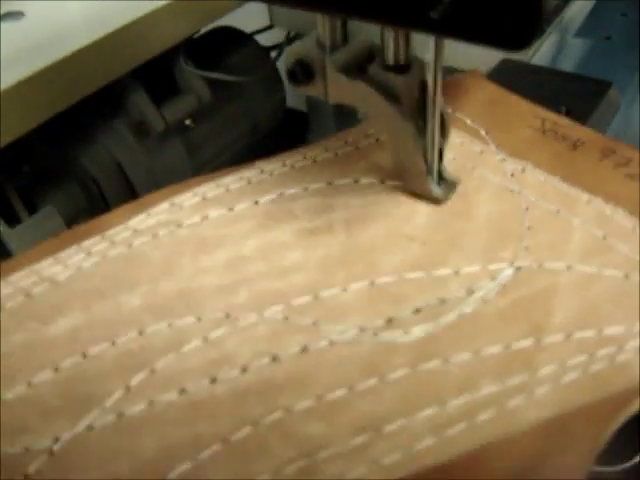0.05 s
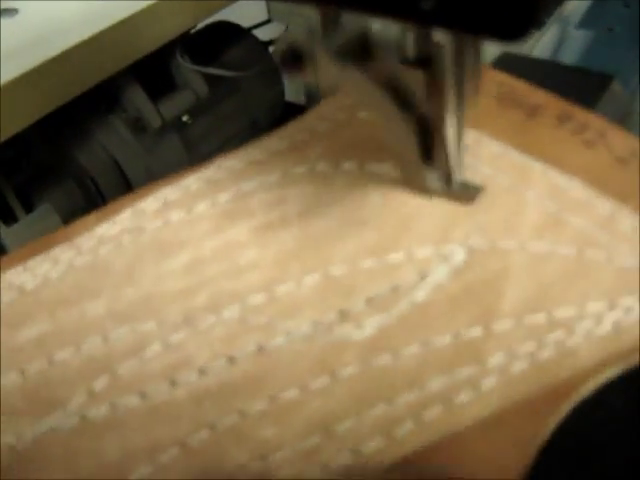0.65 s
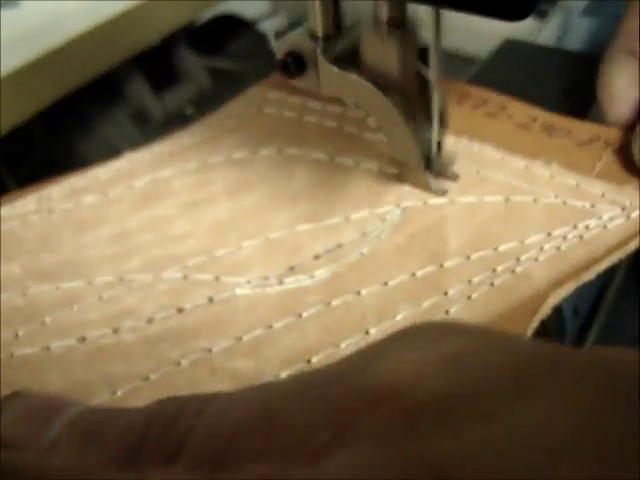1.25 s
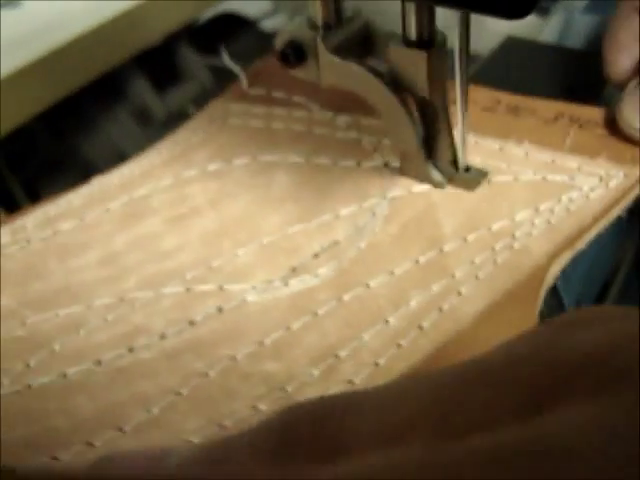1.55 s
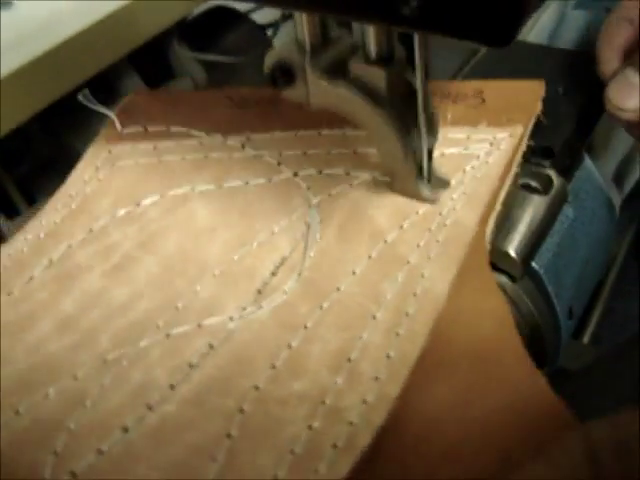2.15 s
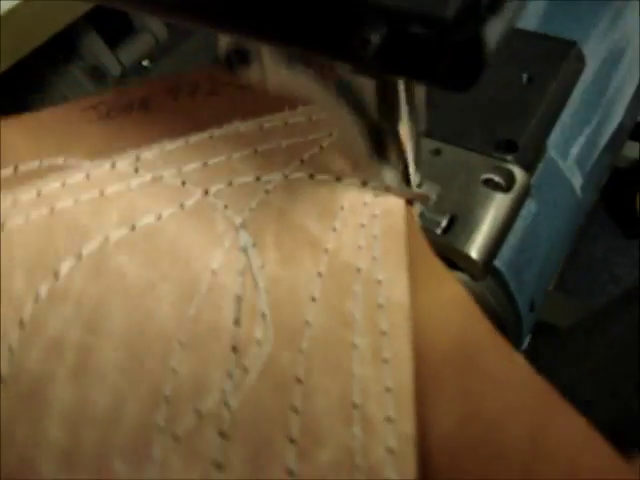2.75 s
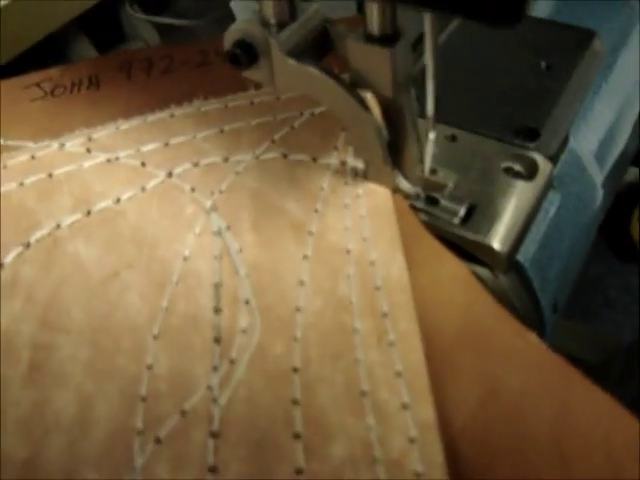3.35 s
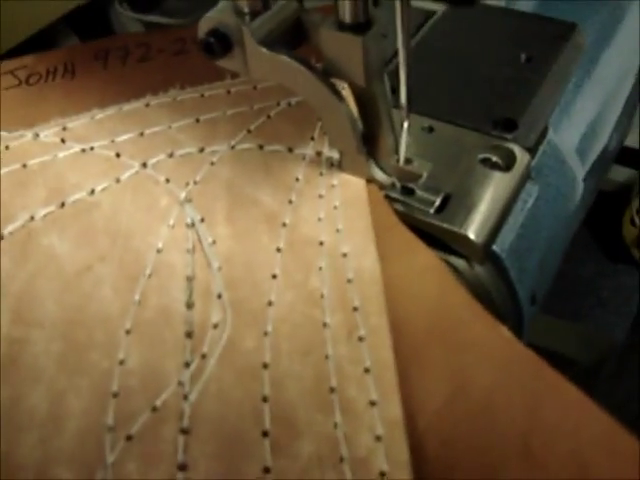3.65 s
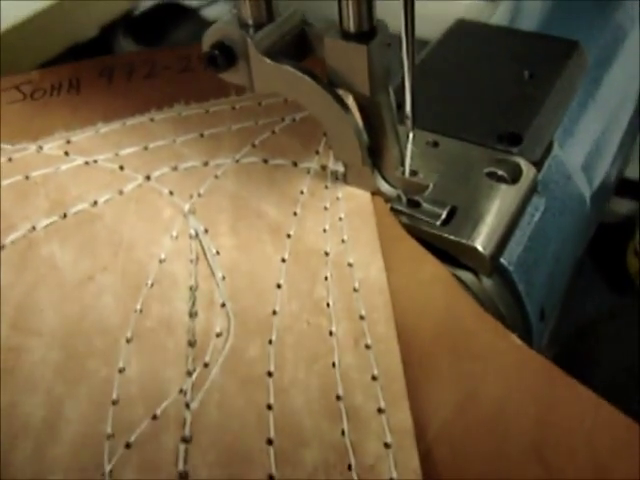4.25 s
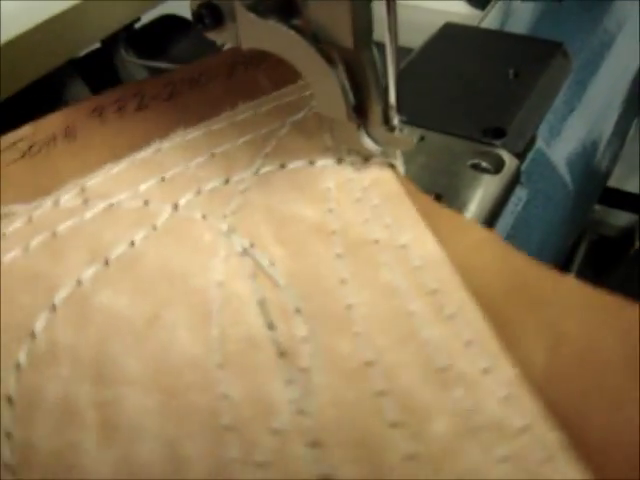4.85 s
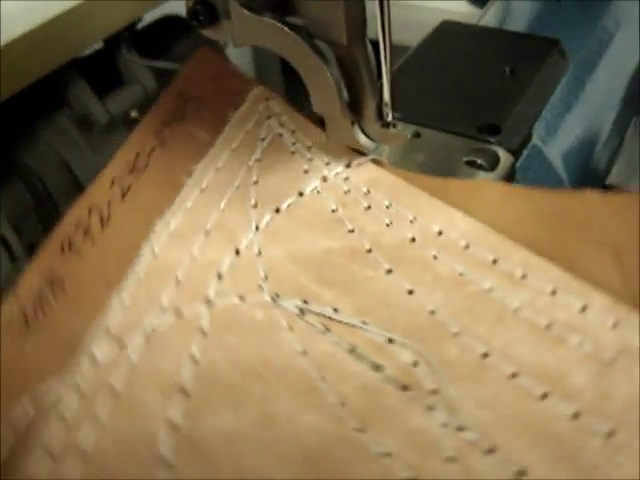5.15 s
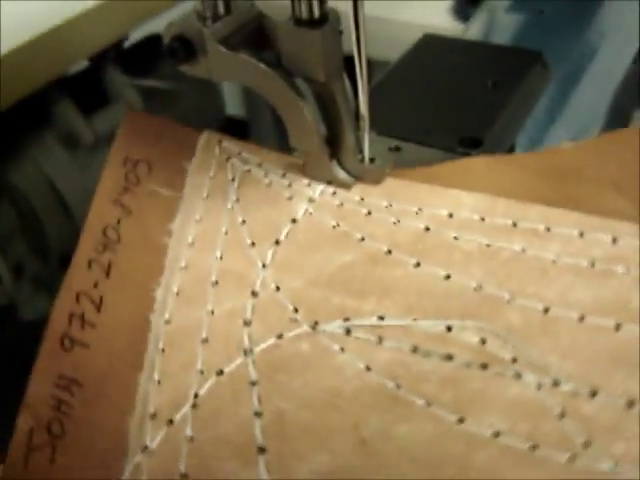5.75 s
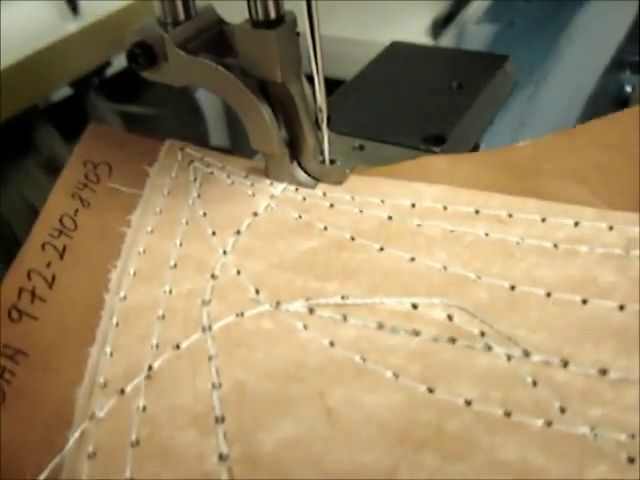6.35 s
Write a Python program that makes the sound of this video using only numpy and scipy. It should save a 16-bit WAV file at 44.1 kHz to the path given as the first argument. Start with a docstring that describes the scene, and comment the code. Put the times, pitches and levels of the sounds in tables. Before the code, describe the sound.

A heavy sewing machine clatters evenly through leather, stops with a clunk, then lever clicks and soft leather handling follow.

```python
"""Walking-foot machine sewing leather

A heavy machine, close by, sews just over four stitches a second. Each shaft turn brings gear rattle,
linkage scrapes, a needle knock, a double clack of the feet and a thread tick; the iron frame rings.
It brakes and latches at about 3 s. The workshop background fades up, the foot lever snaps up,
the leather taps and slides as it is turned, and the foot drops."""
import sys
import numpy as np
from scipy import signal
from scipy.fft import rfft, irfft
from scipy.io import wavfile
from scipy.ndimage import uniform_filter1d, map_coordinates

SR = 44100
rng = np.random.default_rng(int(sys.argv[2]) if len(sys.argv) > 2 else 0)


def materialize(psi):
    """Save the field psi as 16-bit PCM at rate SR to the path in sys.argv[1].

    A 1-D psi becomes a single channel; in a 2-D psi each row is a channel.
    """
    bounded = np.clip(np.atleast_2d(psi).T, -1, 1)
    quanta = np.round(bounded * 32767).astype(np.int16)
    wavfile.write(sys.argv[1], SR, quanta)


N = 291060
TIME = np.arange(N) / SR
LULL_AT_TURNS, LULL_WIDTH_TURNS = 0.559, 0.044  # shaft phase where the feet trade grip

# One stitch per shaft turn. Each row: start in seconds, needle knock in dB, first clack in dB,
# second clack in dB, clack gap in seconds, steel snap in dB, bed thud in dB, thread tick in dB.
STITCHES = [(-.088, -8, -2, -5, 0.014, -24, -16, -2), (.142, -8, -9, -24, 0.015, -16, -40, -13),
            (.372, -11.5, 0.5, -5.5, .012, -17.5, -12.5, -8.5), (.605, -8, 3, -2, 0.014, -24, -16.5, -7.5),
            (.836, -11, -4, -1, 0.011, -12, -12.5, -7.5), (1.069, -10.5, -3, -3.5, 0.015, -22, -18, -9),
            (1.2996, -6, -7.5, -29, .017, -11.5, -25, -10),
            (1.5306, -10.5, -9, -6.5, 0.018, -11.5, -35, -7),
            (1.7609, -11, -12, -5, 0.011, -12.5, -16.5, -6.5), (1.991, -11, -6.5, -18, .015, -12, -20, -10),
            (2.2242, -12.5, -6.5, -13, 0.019, -15.5, -40, -11),
            (2.4553, -12, -2.5, 0, 0.0088, -10.5, -17.5, -6),
            (2.6871, -10.5, -3.5, -0.5, 0.018, -18, -15, -7.5),
            (2.9343, -19, -40, -29, 0.0092, -39, -44, -39)]
# Iron frame and bed. Each row: mode in Hz, level in dB, t60 in seconds.
FRAME_MODES = [(256.5, -15, 0.16), (335.4, -18, 0.42), (680.5, -2, 0.076), (774, -3, 0.093),
               (820, -1, 0.057), (853.5, 1.5, 0.15), (957, -14, 0.079), (1023, -11, 0.16),
               (1113, -5, 0.075), (1150, -23, 0.18), (1528, -12, 0.12), (1743, -17.5, 0.39),
               (1940, -4.5, 0.059), (2880, -12, 0.046), (3253, -6, 0.05), (4420, -12, 0.046)]
# Workshop hiss and sliding leather. Each row: frequency in Hz, level in dB.
HISS_SPECTRUM = [(1500, -30.5), (2600, 1.5), (4500, -1), (7000, -4), (10000, -6.5)]


def undb(db):
    """Decibels to gain."""
    return 10 ** (np.asarray(db) / 20)


def unit(x):
    """Scale to rms 1."""
    return x / np.sqrt(np.mean(x ** 2) + 1e-18)


def convolve(x, response):
    """Filter by a response scaled to unit energy."""
    return signal.oaconvolve(x, response / np.sqrt(np.sum(response ** 2)))[:len(x)]


def colour(x, spectrum, tilt_db_per_oct=0, size=4096):
    """Minimum-phase filter from (Hz, relative dB) points, tilted two octaves either side of 3 kHz."""
    octave = np.log2(np.maximum(np.arange(size // 2 + 1) * SR / size, 1))
    hz, db = np.transpose(spectrum)
    db = np.interp(octave, np.log2(hz), db) + tilt_db_per_oct * np.clip(octave - np.log2(3000), -2, 2)
    cepstrum = irfft(np.log(undb(db)))
    cepstrum[1:size // 2] *= 2
    cepstrum[size // 2 + 1:] = 0
    return convolve(x, irfft(np.exp(rfft(cepstrum))))


def ring(x, modes):
    """Damped modes; each level sets that mode's share of the energy."""
    t = TIME[:SR // 2]
    response = np.zeros(len(t))
    for hz, db, t60_s in modes:
        envelope = undb(db) / np.sqrt(t60_s) * np.exp(-np.log(1000) * t / t60_s)
        response += envelope * np.sin(2 * np.pi * hz * t + rng.uniform(0, 2 * np.pi))
    return convolve(x, response)


def resonance(x, hz, width_hz):
    """Two peak filters in series."""
    b, a = signal.iirpeak(hz, hz / min(1.5 * width_hz, SR / 4), fs=SR)
    one_stage = signal.lfilter(b, a, signal.unit_impulse(4096))
    return convolve(x, signal.lfilter(b, a, one_stage))


def walk(rate_hz):
    """Smooth random drift, rms 1."""
    step = max(int(SR / rate_hz), 1)
    stairs = np.repeat(rng.standard_normal(N // step + 1), step)
    return unit(uniform_filter1d(stairs, step)[:N])


def swells(rows):
    """Summed bell-shaped gain curves."""
    return sum(undb(db) * np.exp(-((TIME - mid_s) / half_s) ** 2) for mid_s, db, half_s in rows)


def chatter(spread_db, size=N, hold_samples=12):
    """Dense micro-impacts of uneven, bounded strength."""
    strength_db = spread_db * np.sqrt(3) * rng.uniform(-1, 1, size // hold_samples + 1)
    return unit(np.repeat(undb(strength_db), hold_samples)[:size] * rng.standard_normal(size))


def contacts(times_s, levels_db, rise_s, decay_s, spread_db=3):
    """Contact force: chatter builds up to each blow and dies away."""
    out = np.zeros(N)
    blows = np.broadcast_arrays(np.atleast_1d(times_s), levels_db, rise_s, decay_s)
    for at_s, db, up_s, down_s in zip(*blows):
        first, last = max(int((at_s - 5 * up_s) * SR), 0), min(int((at_s + 6 * down_s) * SR), N)
        if last > first + 1:
            t = TIME[first:last] - at_s
            envelope = np.exp(np.minimum(t / up_s, -t / down_s))
            burst = unit(envelope * chatter(spread_db, size=len(t)))
            out[first:last] += undb(db) * np.sqrt(np.mean(envelope ** 2)) * burst
    return out


def strike(blows, spectrum, modes, ring_db, rattle_db):
    """Blows on one part: a crack, a buzz of loose joints, then the part's ring."""
    cracks, kicks = np.zeros(N), np.zeros(N)
    for at_s, db, rise_s, decay_s, tilt_db_per_oct in blows:
        force = contacts(at_s, db, rise_s, decay_s, spread_db=3.5)
        force += contacts(at_s + decay_s, db + rattle_db, rise_s, 3 * decay_s, spread_db=16)
        cracks += colour(force, spectrum, tilt_db_per_oct)
        kicks[int(at_s * SR)] = np.sqrt(np.sum(force ** 2))
    return cracks + undb(ring_db) * ring(kicks, modes)


def workshop(fade_from_s=3.27, fade_db_per_s=7):
    """Drone, rumble, hiss and motor hum; turned down during stitching, faded up afterwards."""
    # Drone and rumble spectra. Each row: frequency in Hz, level in dB.
    drone_spectrum = [(150, -31.5), (250, -5), (280, -13), (416, -10), (462, -11), (534, 1), (574, -5.5),
                      (678, -9.5), (844, -6.5), (1050, -14.5), (1770, -19.5), (2060, -17.5), (3000, -30.5),
                      (3900, -50), (6600, -120)]
    rumble_spectrum = [(12, -50), (20, -14), (43, 0.5), (76, -3.5), (108, 1.5), (123, 5.5), (144, -3.5),
                       (177, 2.5), (239, -5), (275, -7.5), (318, -4.5), (350, -19.5), (460, -43.5),
                       (770, -120)]
    # Idling motor. Each row: partial in Hz, relative level in dB.
    motor_partials = [(113.2, 2), (95.5, -4.5), (178.2, -3), (520, -13.5), (707, -19.5), (1040, -14.5)]
    # Surges of the hum. Each row: middle in seconds, level in dB, half length in seconds.
    hum_surges = [(4.08, -55, .07), (5.15, -47, 0.14), (5.93, -44.5, 0.091), (6.3, -51.5, 0.065)]
    dip_db = np.clip(13 - fade_db_per_s * (TIME - fade_from_s), 0, 13)
    drone = undb(-40.5 - dip_db + 0.93 * walk(14)) * colour(chatter(1.1), drone_spectrum)
    rumble = undb(-42 - dip_db + walk(4.09)) * colour(chatter(1), rumble_spectrum, size=16384)
    hiss = undb(-55 - 0.37 * dip_db + 0.53 * walk(25)) * colour(chatter(6), HISS_SPECTRUM)
    hum = np.zeros(N)
    for hz, db in motor_partials:
        amplitude = np.sqrt(2) * undb(db + 1.2 * walk(7))
        hum += amplitude * np.sin(2 * np.pi * np.cumsum(hz + 2.73 * walk(14)) / SR)
    return drone + rumble + hiss + (undb(-53.5 - dip_db) + swells(hum_surges)) * hum


def room(x, wet_db=-21, t60_s=0.17):
    """Short, dull reflections from bench and walls."""
    t = TIME[:SR // 2]
    tail = rng.standard_normal(len(t)) * np.exp(-np.log(1000) * t / t60_s) * (t > 0.004)
    return x + undb(wet_db) * convolve(x, colour(tail, [(300, 7), (2500, 9), (9000, -34)]))


def leather(faint_count=8, faint_from_s=4.2):
    """Leather taps the arm and slides over the bed; fainter taps fall at random."""
    # Taps. Each row: time in seconds, level in dB.
    tap_events = [(3.2955, -30), (3.8841, -32), (3.9534, -34), (4.6762, -30.5), (4.705, -30), (5.3959, -26),
                  (5.5608, -24.5), (5.7987, -27), (5.8695, -25.5), (5.8924, -23), (5.9035, -22),
                  (6.266, -28), (6.5872, -23)]
    # Tap spectrum. Each row: frequency in Hz, level in dB.
    tap_spectrum = [(200, -9), (700, -1), (1150, 2), (1600, -5), (2200, -2.5), (4000, -3), (7000, -11),
                    (10000, -10)]
    # Slides. Each row: middle in seconds, level in dB, half length in seconds.
    slide_events = [(4.72, -55, 0.16), (5.2, -50.5, 0.34), (6.17, -53, 0.047), (6.55, -52, 0.36)]
    tap_s, tap_db = np.transpose(tap_events)
    when, strength = rng.random((faint_count, 2)).T
    tap_s = np.r_[tap_s, faint_from_s + when * (TIME[-1] - faint_from_s)]
    tap_db = np.r_[tap_db, -34 + 4 * strength]
    force = contacts(tap_s, tap_db, rise_s=0.0014, decay_s=0.0085, spread_db=7)
    taps = colour(force, tap_spectrum, tilt_db_per_oct=-2)
    slides = swells(slide_events) * undb(4.2 * walk(25)) * colour(chatter(4.8), HISS_SPECTRUM)
    return undb(-7.5) * taps + slides


def stop_latch():
    """The latch catches and rings the frame."""
    # Catches. Each row: time in seconds, level in dB, rise and decay in seconds, tilt in dB/octave.
    blows = [(3.043, -19, 0.00093, 0.0032, -2), (3.0886, -11, 0.0026, 0.0025, 2),
             (3.1277, -8.5, 0.00036, 0.0029, 5.5), (4.5945, -16.5, 0.00058, 0.0047, 0),
             (4.602, -27.5, .001, 0.0078, -9)]
    # Latch spectrum. Each row: frequency in Hz, level in dB.
    spectrum = [(100, -16), (400, -1.5), (750, 5.5), (1150, -1), (1700, -9), (2400, -5.5), (3400, 2.5),
                (4300, -6.5), (4900, -12), (6700, -7.5), (10000, -11)]
    return undb(-1.5) * strike(blows, spectrum, FRAME_MODES, ring_db=-19, rattle_db=-52)


def foot_lift():
    """The foot lever snaps up and rings its spring."""
    # Snaps. Each row: time in seconds, level in dB, rise and decay in seconds, tilt in dB/octave.
    blows = [(4.471, -33, 0.002, 0.0068, -6), (4.4768, -16, 0.00091, 0.0046, 1),
             (4.484, -18.5, 0.00085, 0.0074, 0.5), (4.498, -38, .002, 0.018, -6)]
    # Lever spectrum. Each row: frequency in Hz, level in dB.
    spectrum = [(100, -4), (300, -13), (520, 6), (900, -2.5), (1350, -18), (2000, 0.5), (4000, 1),
                (6000, 4.5), (10000, -7)]
    # Spring. Each row: mode in Hz, level in dB, t60 in seconds.
    spring_modes = [(2070, -10, 0.35), (2106, -3.5, 0.053), (3321, -10, 0.14), (4300, -8, 0.096),
                    (5850, -8, .07), (6500, -13, .04), (6900, -3, .05), (7750, -10, .04), (8870, 0, 0.028),
                    (9660, 0, 0.024)]
    return strike(blows, spectrum, spring_modes, ring_db=-3, rattle_db=-11)


def foot_drop():
    """The foot drops, rattles to rest and rings the presser bar."""
    # Impacts. Each row: time in seconds, level in dB, rise and decay in seconds, tilt in dB/octave.
    blows = [(6.026, -27.5, 0.0045, 0.016, -1.5), (6.0395, -9, 0.00046, 0.0029, 0.5),
             (6.05, -20.5, 0.0033, 0.0098, -4), (6.0655, -15.5, .001, 0.008, 2),
             (6.09, -28.5, 0.011, 0.028, 2.5)]
    # Impact spectrum. Each row: frequency in Hz, level in dB.
    spectrum = [(100, -20), (350, -5.5), (680, 4.5), (1000, 0.5), (1300, -11), (2200, -1.5), (3000, -3.5),
                (3600, 0.5), (4300, -3), (5000, 2), (5700, -6), (8000, -6), (10000, -10)]
    # Presser bar. Each row: mode in Hz, level in dB, t60 in seconds.
    bar_modes = [(533, -6, .12), (1570, -4, .06), (2283, -4, .1), (3601, -3, .08), (4750, -5, .05),
                 (5080, -4, .05), (6320, -3, .06), (8050, -6, .05), (9275, 0, .15)]
    return strike(blows, spectrum, bar_modes, ring_db=-6.5, rattle_db=-16)


def stop_thud():
    """The shaft hits its stop and shakes the bench."""
    force = contacts(3.128, -20.5, rise_s=0.00048, decay_s=0.0024)
    return colour(force, [(40, -20), (110, 0), (350, -1), (700, -2), (1200, -11), (4000, -40)])


def shaft_turns():
    """Running count of shaft turns."""
    start_s = np.transpose(STITCHES)[0]
    edges_s = np.r_[start_s, 2 * start_s[-1] - start_s[-2]]
    return np.interp(TIME, edges_s, np.arange(len(edges_s)))


def past_lull():
    """Shaft phase from the lull, in lull widths."""
    return (shaft_turns() % 1 - LULL_AT_TURNS) / LULL_WIDTH_TURNS


def drive_gain(brake_at_s=2.81, brake_takes_s=0.084, halt_at_s=3.115):
    """The drive sags, brakes and halts; each turn has a lull, then a lighter return stroke."""
    braking = np.clip((TIME - brake_at_s) / brake_takes_s, 0, 1)
    halted_s = np.clip(TIME - halt_at_s, 0, 0.5)
    drive_db = 2 - 0.5 * TIME - 4.5 * braking - 754 * halted_s
    lull_db = 8.5 * np.exp(-past_lull() ** 2)
    return_db = 2 * np.clip(past_lull(), 0, 1)
    return undb(drive_db - lull_db - return_db)


def frame(force, waver_share=0.0042, waver_hz=45):
    """The iron frame rings, wavering as parts bear on it, choked as the feet clamp the leather."""
    drift_s = signal.lfilter([1 / SR], [1, -np.exp(-waver_hz / SR)], waver_share * walk(waver_hz))
    wavering = map_coordinates(ring(force, FRAME_MODES), [(TIME + drift_s) * SR], order=1, mode="nearest")
    clamped = np.exp(-past_lull() ** 2)
    return wavering * undb(-4.5 * clamped)


def gears(teeth=23):
    """Each tooth meets with a burst of rattle and keeps the frame ringing."""
    # Rattle spectrum. Each row: frequency in Hz, level in dB.
    spectrum = [(35, -47), (60, -10), (231, -6.5), (468, -9), (835, 1), (949, -1.5), (1310, -13.5),
                (1970, -7.5), (2330, -11), (2890, -8.5), (3290, -13.5), (3660, -11), (5260, -14),
                (6240, -39.5), (10000, -64), (13000, -55), (22000, -120)]
    tooth_phase = teeth * shaft_turns() % 1
    effort = drive_gain() * unit(undb(-9 * tooth_phase)) * undb(1.3 * walk(160))
    rattle = colour(effort * chatter(2.3, hold_samples=24), spectrum)
    return undb(-26.5) * rattle + undb(-29) * frame(effort * chatter(4.9))


def linkage():
    """Loose joints clatter and sliding parts sing at set points in each turn."""
    # Joint play. Each row: lag in seconds, level in dB, decay in seconds, centre and width in Hz.
    joints = [(-.054, -24, 0.0067, 3030, 1500), (-.024, -22.5, 0.0033, 845, 500),
              (-.023, -23.5, 0.02, 2100, 1450), (.0015, -16.5, 0.0054, 2030, 640),
              (.002, -23, 0.0053, 3030, 400), (.003, -34.5, 0.0054, 169, 100),
              (.017, -21.5, 0.0049, 5500, 4900), (.0225, -21, 0.0041, 830, 306),
              (.034, -28, 0.012, 5900, 4970), (.063, -27.5, 0.0046, 810, 400),
              (0.064, -24.5, 0.0063, 3540, 3060), (.078, -28.5, 0.0032, 197, 120),
              (0.142, -18.5, 0.0016, 2400, 2020)]
    # Rubs. Each row: lag in seconds, level in dB, rise and decay in seconds, centre and width in Hz.
    scrapes = [(-.065, -25, 0.0022, 0.0059, 4060, 250), (-.031, -28, 0.0054, 0.032, 4440, 130),
               (-.028, -24, 0.007, .022, 3900, 730), (-.024, -28.5, 0.0087, 0.017, 3650, 200),
               (.004, -27.5, 0.0016, 0.02, 1892, 70), (.005, -27.5, .002, 0.084, 2932, 128),
               (.011, -27, .004, 0.061, 3490, 150), (.09, -31, 0.017, 0.0076, 2160, 90),
               (.143, -27.5, 0.0016, 0.014, 3620, 138)]
    start_s, knock_db, *_ = np.transpose(STITCHES)
    effort_db = 0.28 * (knock_db - knock_db[0])
    out = np.zeros(N)
    for lag_s, db, decay_s, hz, width_hz in joints:
        time_jitter, level_jitter = rng.standard_normal((len(start_s), 2)).T
        times_s = start_s + lag_s + 0.0004 * time_jitter
        levels_db = db + effort_db + 0.75 * level_jitter
        out += resonance(contacts(times_s, levels_db, 0.0007, decay_s), hz, width_hz)
    for lag_s, db, rise_s, decay_s, hz, width_hz in scrapes:
        levels_db = db + effort_db + 0.5 * rng.standard_normal(len(start_s))
        force = contacts(start_s + lag_s, levels_db, rise_s, decay_s, spread_db=4.5)
        out += resonance(force, hz, width_hz)
    return out * drive_gain()


def take_up(lag_s=0.1645):
    """A bright tick late in each turn as the thread pulls tight."""
    # Tick spectrum. Each row: frequency in Hz, level in dB.
    spectrum = [(60, -20), (200, -8), (1500, -25), (3200, -5), (4200, -0.5), (5400, -9), (6600, 3.5),
                (8500, 4.5), (10000, -6.5)]
    start_s, *_, tick_db = np.transpose(STITCHES)
    force = contacts(start_s + lag_s, tick_db, rise_s=0.0008, decay_s=0.0021)
    return undb(-6.5) * colour(force, spectrum) + undb(-16) * frame(force)


def needle(lag_s=0.00146):
    """The needle bar drives through the leather with a knock."""
    # Knock spectrum. Each row: frequency in Hz, level in dB.
    spectrum = [(88, -32), (150, -17), (478, -5), (825, -12.5), (1300, -20), (1550, 7.5), (1920, -3.5),
                (2330, 4), (2630, -45), (2920, -20), (3190, -12), (3550, -1), (4460, -4), (6110, 2.5),
                (10000, -14), (13000, -56), (22000, -120)]
    start_s, knock_db, *_ = np.transpose(STITCHES)
    force = contacts(start_s + lag_s, knock_db, rise_s=0.00055, decay_s=0.0057, spread_db=2)
    return undb(-7.5) * colour(force, spectrum) + undb(-18) * frame(force)


def feet(lag_s=0.105, decay_s=0.0069):
    """The two feet trade places with a double clack: steel snaps, the bed thuds."""
    # Clack body and steel snap spectra. Each row: frequency in Hz, level in dB.
    body_spectrum = [(40, -32), (120, -20), (400, -17), (750, -0.5), (1200, -0.5), (2100, -1.5),
                     (2600, -5.5), (4200, 0), (5600, -1), (10000, -14.5)]
    snap_spectrum = [(3000, -20.5), (5500, -11), (6900, 1), (8200, -9), (10000, -15.5)]
    start_s, _, first_db, second_db, gap_s, snap_db, thud_db, _ = np.transpose(STITCHES)
    pair_s = np.r_[start_s - gap_s, start_s] + lag_s
    body_force = contacts(pair_s, np.r_[first_db, second_db], 0.0022, decay_s, spread_db=0.5)
    snap_force = contacts(pair_s, np.r_[snap_db - 2, snap_db], 0.0017, 0.39 * decay_s, spread_db=2.5)
    thud_force = contacts(pair_s, np.r_[thud_db, thud_db], 0.0015, 1.18 * decay_s)
    body = undb(-12.5) * colour(body_force, body_spectrum)
    snap = undb(-1.5) * colour(snap_force, snap_spectrum)
    return body + snap + undb(-1) * frame(thud_force)


def scene():
    """Machine, levers and leather in the workshop; mono."""
    machine = gears() + linkage() + needle() + take_up() + feet() + stop_thud()
    low_cut = signal.butter(1, 62, "high", fs=SR, output="sos")  # bass rolls off below 62 Hz
    close = signal.sosfilt(low_cut, machine) + stop_latch() + foot_lift() + foot_drop() + leather()
    return (room(close) + workshop())[None]


def record(dry):
    """Soft peak limiting, then a steep treble cut."""
    ceiling, top_hz = 0.8, 10200
    rounded = ceiling * np.tanh(undb(0.37) * dry / ceiling)
    low_pass = signal.firwin(161, top_hz, window=("kaiser", 6), fs=SR)
    return signal.oaconvolve(rounded, low_pass[None], "same")


dry = scene()
out = record(dry)
materialize(out)
```